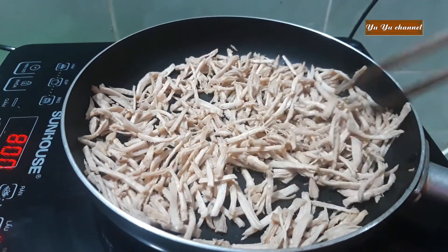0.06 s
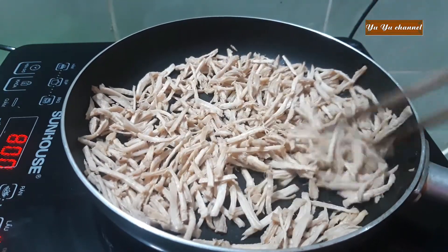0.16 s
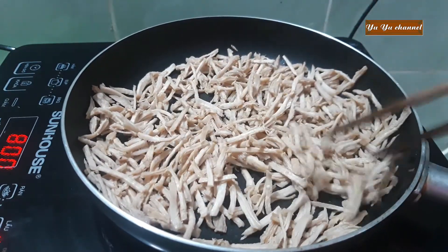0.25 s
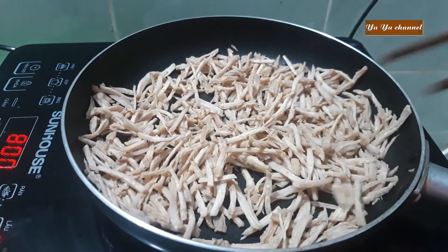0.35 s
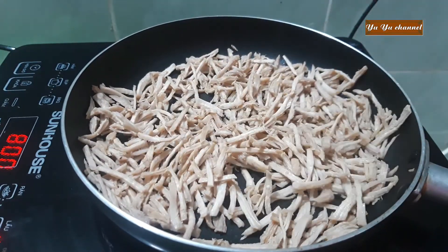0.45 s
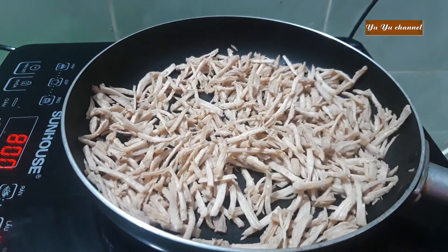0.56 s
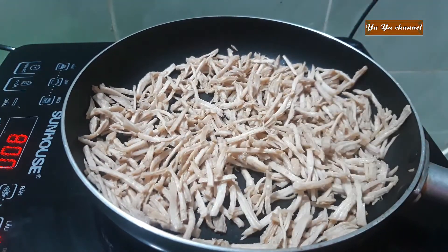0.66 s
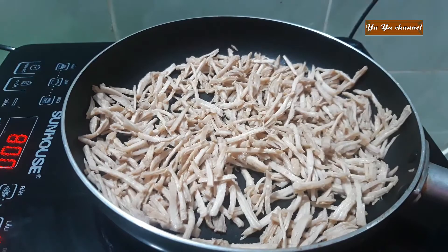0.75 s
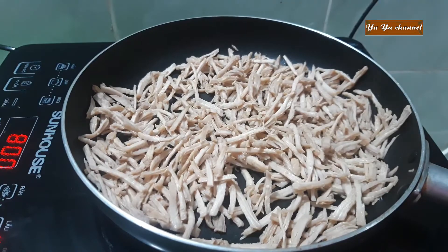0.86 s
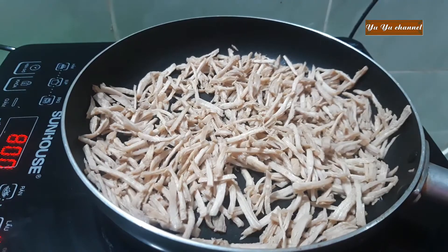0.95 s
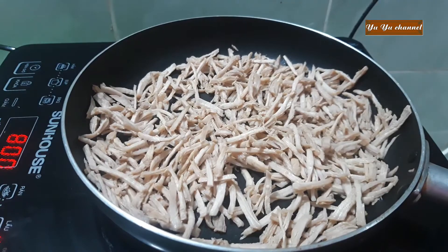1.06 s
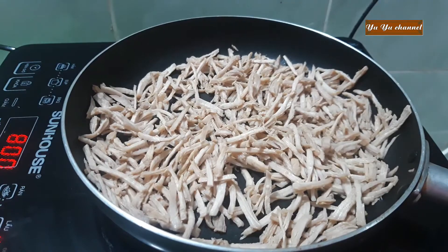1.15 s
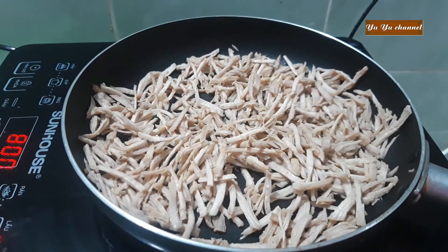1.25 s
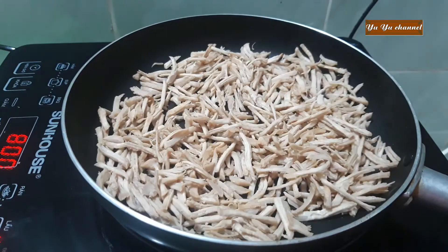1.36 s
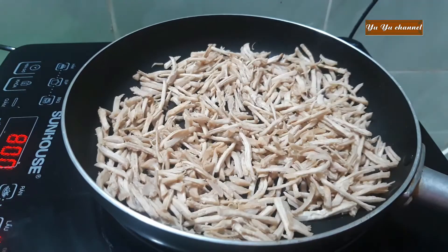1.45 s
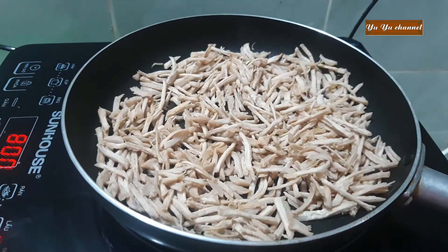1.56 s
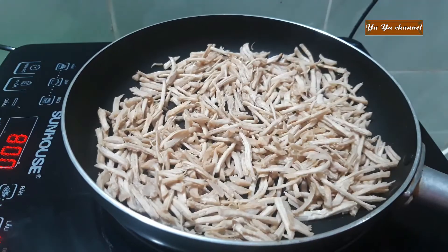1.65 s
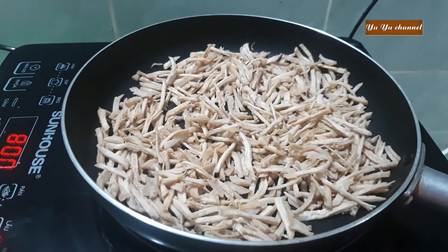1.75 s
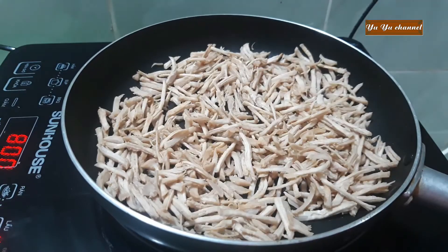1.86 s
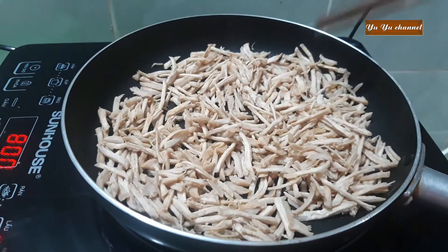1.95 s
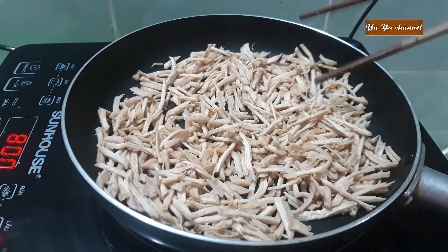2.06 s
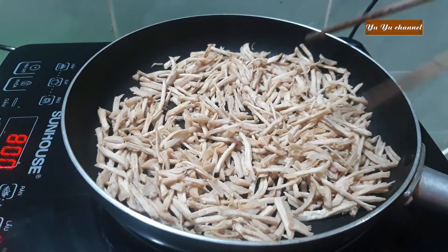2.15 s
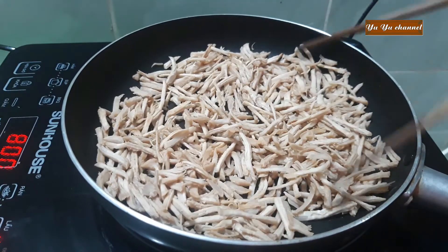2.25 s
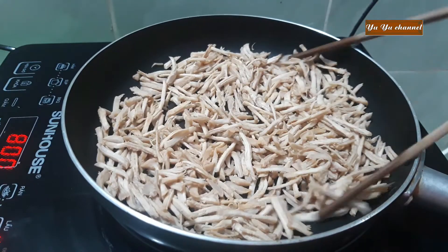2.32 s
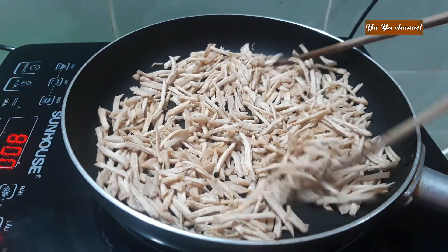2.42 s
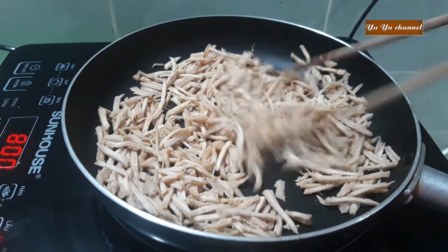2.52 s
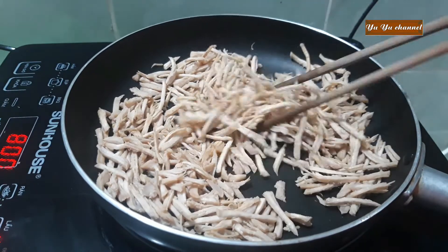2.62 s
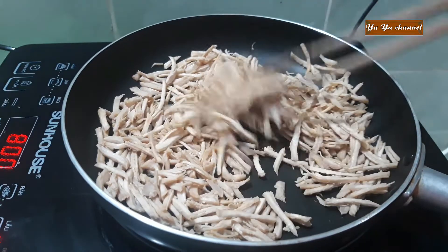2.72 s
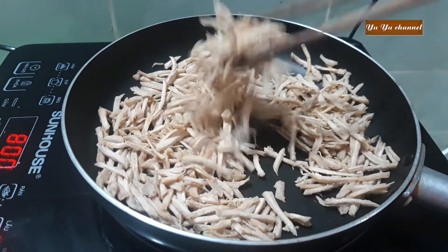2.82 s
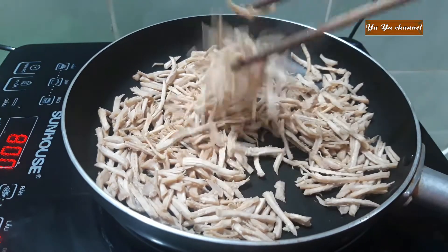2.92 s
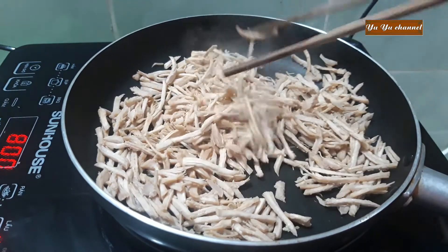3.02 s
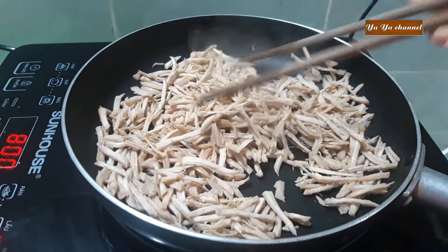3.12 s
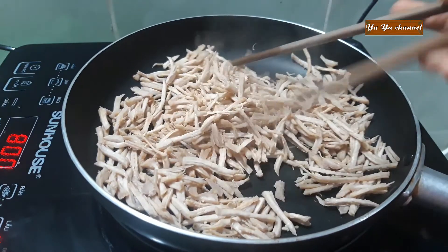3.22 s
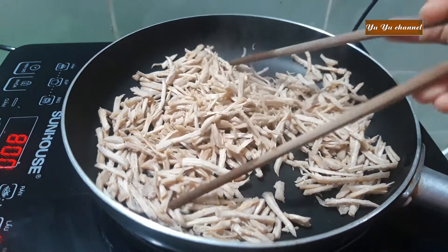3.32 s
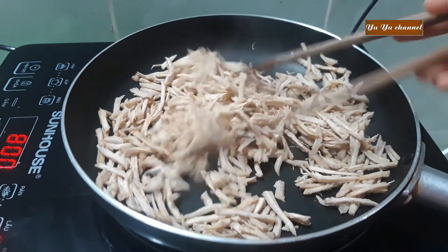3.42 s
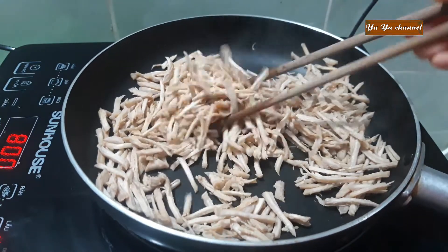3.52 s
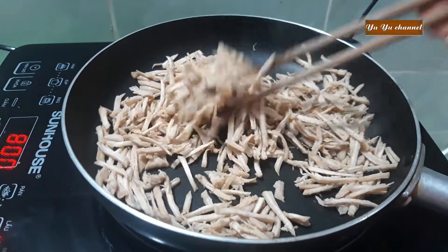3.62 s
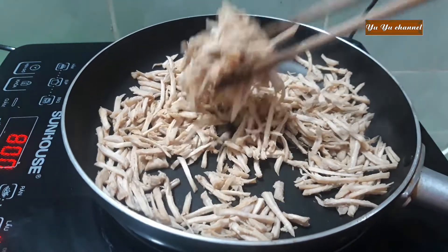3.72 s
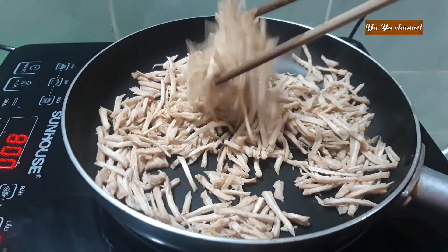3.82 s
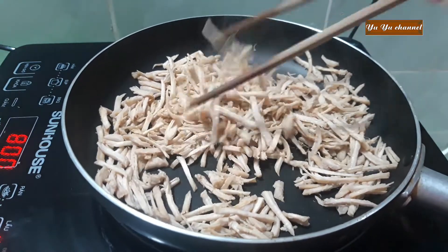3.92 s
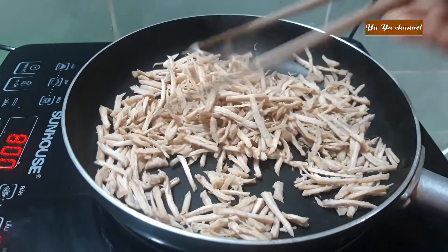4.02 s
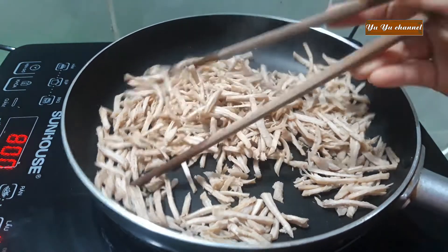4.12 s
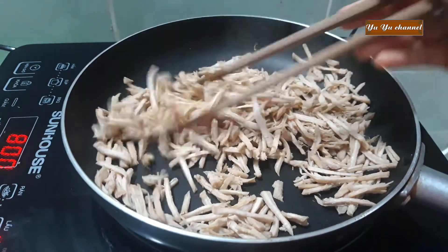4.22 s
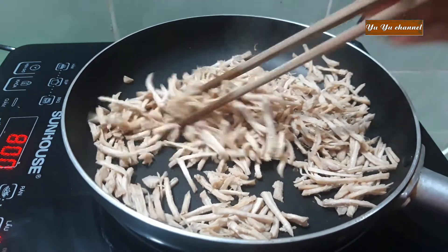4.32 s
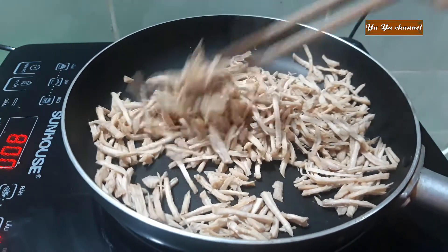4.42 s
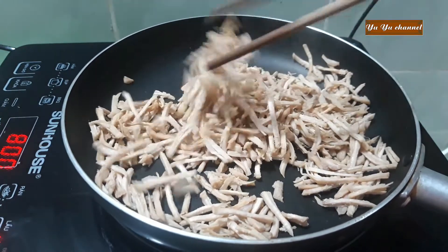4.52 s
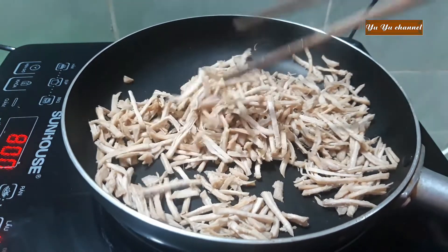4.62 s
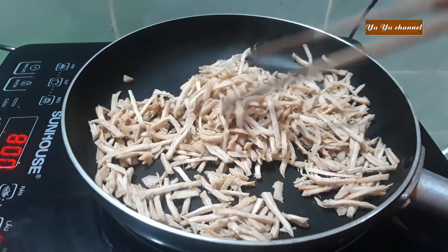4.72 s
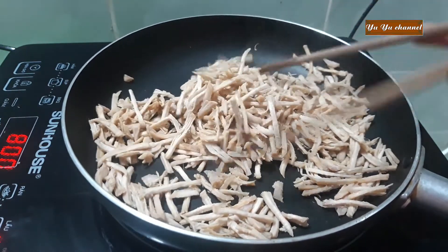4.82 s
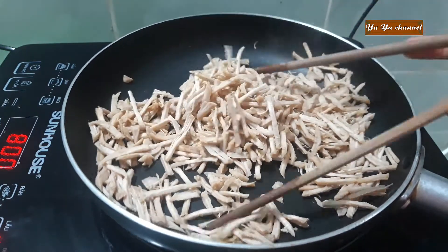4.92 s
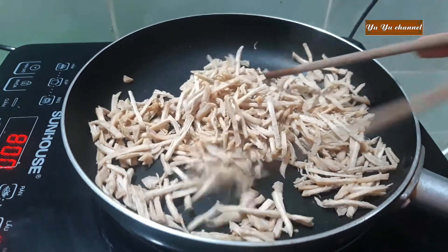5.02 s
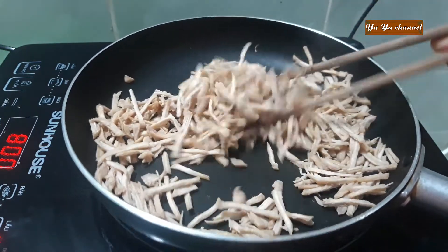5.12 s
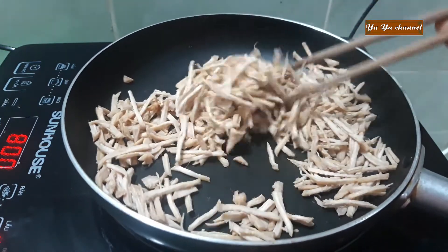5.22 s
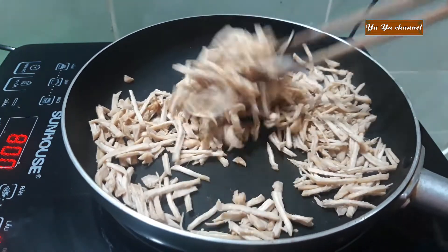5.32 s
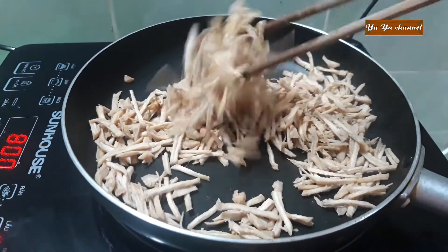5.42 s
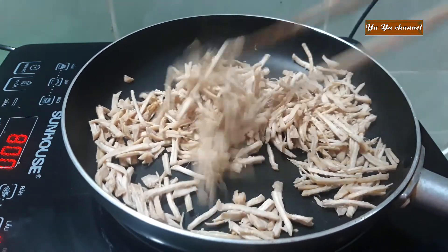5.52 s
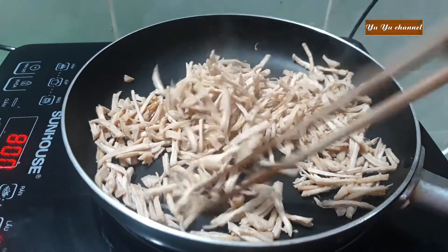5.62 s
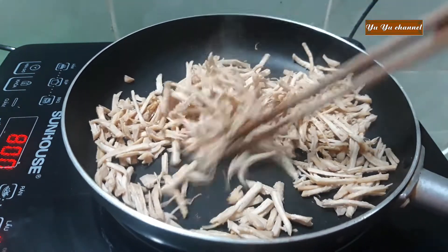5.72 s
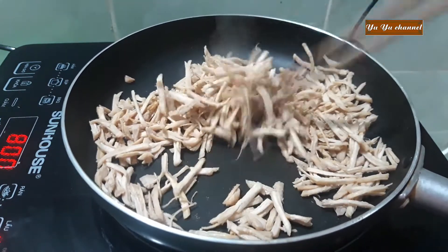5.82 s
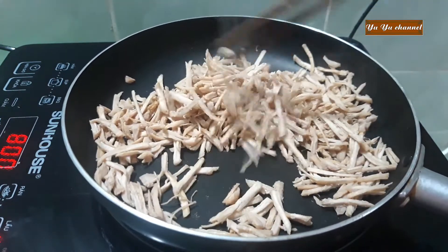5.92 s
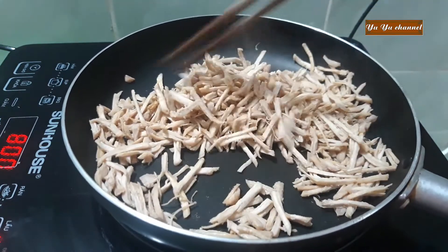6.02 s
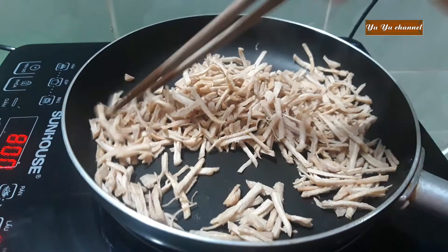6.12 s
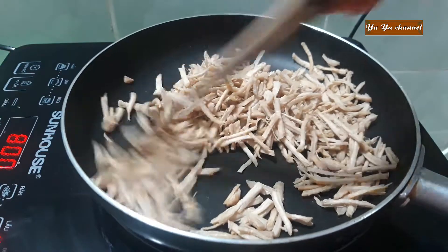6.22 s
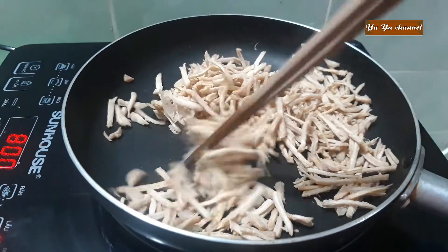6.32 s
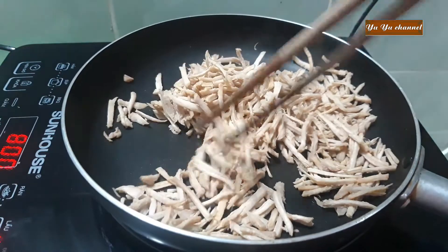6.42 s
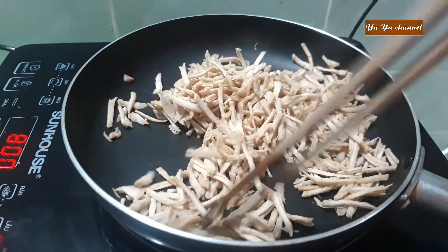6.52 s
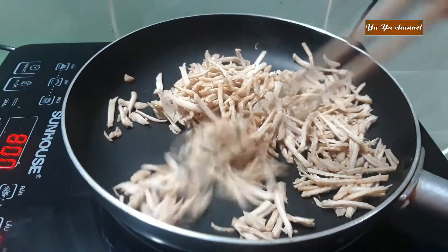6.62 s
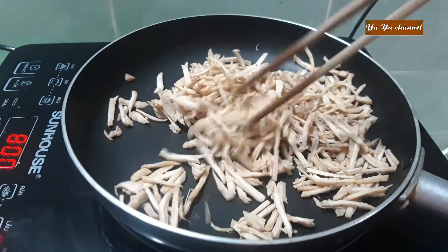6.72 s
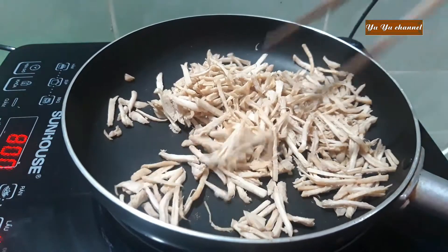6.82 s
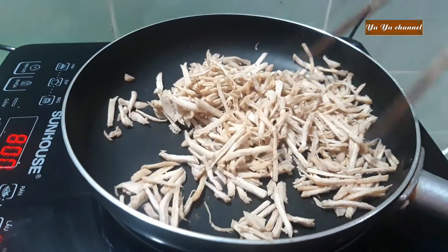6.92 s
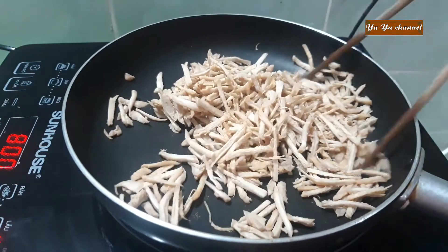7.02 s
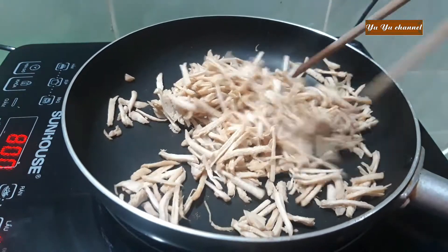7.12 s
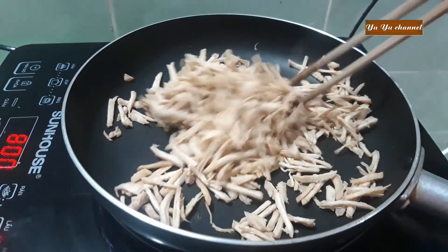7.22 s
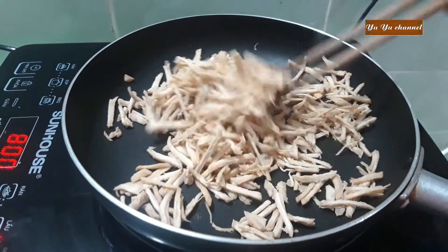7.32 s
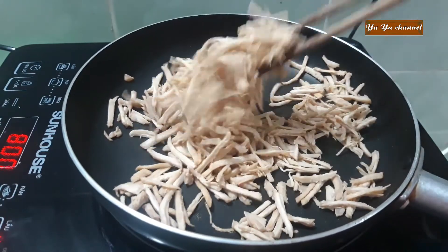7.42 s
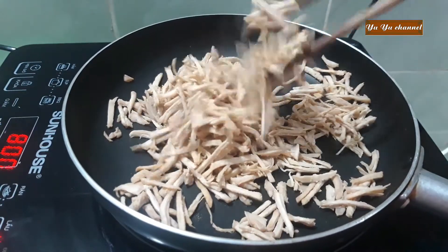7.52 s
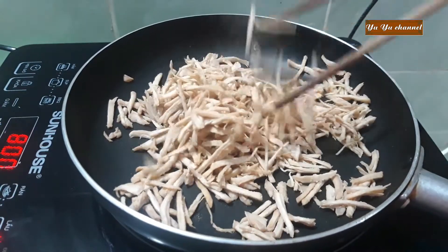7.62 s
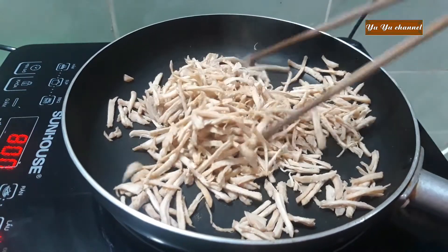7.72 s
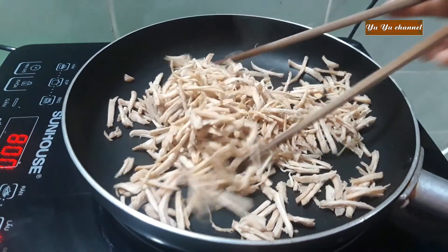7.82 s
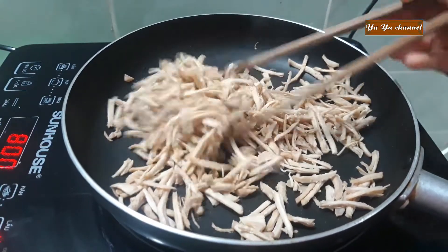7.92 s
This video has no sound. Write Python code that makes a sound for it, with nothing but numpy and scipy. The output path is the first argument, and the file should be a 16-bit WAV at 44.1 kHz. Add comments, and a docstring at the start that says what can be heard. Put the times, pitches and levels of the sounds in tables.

```python
"""One microphone, close to a thin pan on an electric hob in a small kitchen.
From the start the hob's cooling fan hums underneath and shredded meat fries: steam bubbles burst in the
fat as hiss, crackle and pops. Wooden chopsticks tap the pan once, then toss the meat from about two
seconds on, tapping and scraping the metal so that it rings. Around the middle a low handling rumble
swells. Just after four seconds the pan jolts on the glass top, and again, faintly, at seven."""
import sys
import numpy as np
from scipy import signal
from scipy.fft import rfft, irfft, next_fast_len
from scipy.io import wavfile
from scipy.ndimage import map_coordinates

SR = 44100
rng = np.random.default_rng(int(sys.argv[2]) if len(sys.argv) > 2 else 0)


def waveform_to_disk(signal):
    """Save audio, clipped to [-1, 1], as 16-bit WAV at the path in sys.argv[1]."""
    frames = np.transpose(np.atleast_2d(signal))
    scaled = np.clip(frames, -1, 1) * 32767
    samples = np.round(scaled).astype(np.int16)
    wavfile.write(sys.argv[1], SR, samples)


N = 351036

# The fan's rushing air. Each row: frequency in Hz, relative level in dB.
AIR_COLOUR = [(18, -46), (30, -11.5), (69, -0.5), (128, -5), (189, -5), (252, -10), (396, -1), (447, -3),
              (527, -2.5), (608, -5.5), (897, -2.5), (2040, -16), (4000, -28.5), (5200, -27), (8800, -120)]
# Blade and motor tones. Each row: frequency in Hz, level in dB.
FAN_TONES = [(176.5, -66.5), (199.6, -63), (224, -76.5), (404, -66), (528.5, -64.5), (882, -69),
             (1059, -70.5), (1235, -72.5)]
# A low handling rumble that swells around the middle. Each row: time in seconds, gain in dB.
HANDLING_RUMBLE = [(0, -12), (1.3, -11), (1.7, -2), (3.3, -2), (4.7, 3), (5.8, 0), (6.2, -1), (7.96, 0)]
# How hard the fat fries. Each row: time in seconds, level in dB.
FRYING_LEVEL = [(0, -43), (.2, -39), (.35, -42), (.9, -39), (1.26, -41), (1.43, -45), (2.25, -45),
                (2.62, -34), (2.72, -36.5), (2.77, -46), (2.9, -47), (2.95, -39), (3.38, -36), (3.6, -35),
                (3.72, -46), (3.89, -44), (4.17, -40), (4.28, -31.5), (4.53, -42.5), (4.8, -39.5),
                (5.06, -37), (5.23, -38), (5.33, -47.5), (5.45, -42), (5.69, -43), (5.91, -44), (6.1, -41),
                (6.35, -39), (6.51, -43), (6.97, -39), (7.2, -35), (7.5, -38), (7.96, -35)]
# Juice boils off hot metal. Each row: time of the crest in seconds, level in dB, seconds to fall 10 dB.
SPURTS = [(0.101, -39, 0.0466), (.22, -34, 0.05), (.54, -41.5, 0.0671), (.73, -40.5, 0.0236),
          (.9, -40, .04), (1.11, -41, 0.0159), (1.85, -45.5, 0.0068), (2.84, -43.5, 0.06),
          (3.05, -35, 0.0426), (3.13, -35, 0.0549), (3.431, -30, 0.1174), (3.941, -35.5, 0.0921),
          (4.86, -42.5, 0.05), (4.98, -36.5, 0.0616), (5.111, -35.5, 0.1123), (5.469, -36, 0.03),
          (5.6, -39, 0.03), (5.8, -30, 0.0992), (5.989, -37.5, 0.0946), (6.19, -36, 0.072),
          (6.32, -36, 0.11), (6.7, -33, 0.15), (7.21, -33.5, 0.0817), (7.37, -36, .04), (7.67, -37, 0.05),
          (7.841, -35.5, 0.0523)]
# Frying heard from close by. Each row: frequency in Hz, relative level in dB.
FRYING_COLOUR = [(710, -61.5), (1200, -18), (1440, -9), (2020, -14.5), (2680, -9.5), (3290, -2), (3700, -7),
                 (4310, -0.5), (4860, -3.5), (9410, 0), (10300, -4), (16000, -5)]
# The biggest bubbles. Each row: start in seconds, level in dB, pitch in Hz.
BIG_POPS = [(0.03, -6, 4500), (0.0904, -14.5, 5360), (0.1665, -16.5, 9075), (0.1749, -16, 5700),
            (0.1902, -8.5, 6820), (0.2079, -12, 9480), (0.2202, -12, 6400), (0.2512, -6, 7260),
            (0.2584, -15, 7100), (0.34, -17, 5692), (0.5087, -6, 4600), (0.5885, -15, 4178),
            (0.7139, -12.5, 7030), (0.801, -17, 6130), (0.8444, -9, 8800), (0.8728, 2.5, 4655),
            (1.0933, -15, 5200), (1.1058, -15, 6300), (1.1709, -14.5, 7150), (1.2472, -17.5, 5810),
            (1.33, -19.5, 6993), (1.5906, -8, 9230), (1.8198, -11, 5400), (2.1324, -17.5, 9870),
            (2.4543, -12, 7703), (2.5696, -8, 8810), (2.5751, -12.5, 5900), (2.5834, -9, 8420),
            (2.6347, -7, 13000), (2.719, -14.5, 5500), (2.8145, -10, 6463), (2.8464, -17, 5477),
            (2.9795, -13, 6710), (3.0146, -11.5, 13000), (3.0556, -12, 5920), (3.0626, -11, 5900),
            (3.1092, -13, 11400), (3.2477, -14.5, 5511), (3.2496, -9, 5719), (3.3073, -11.5, 6490),
            (3.3201, -9.5, 7040), (3.412, -11, 6700), (3.4401, -13, 12750), (3.4873, -2.5, 10900),
            (3.6441, -15.5, 7500), (3.7452, -18.5, 6193), (3.8311, -19, 5600), (3.8643, -17, 8060),
            (3.9113, -10, 10780), (3.9241, -14.5, 5570), (4.1438, -14.5, 7470), (4.2541, -13, 9440),
            (4.3231, -8.5, 7057), (4.4127, -15, 9080), (4.4374, -12.5, 4756), (4.6752, -16, 11050),
            (4.7739, -2.5, 7978), (4.8437, -11, 7035), (4.9174, -16, 8290), (4.9759, -15, 6800),
            (4.99, -11.5, 6270), (5.0205, -8.5, 8990), (5.0383, -11.5, 8300), (5.3819, -13, 7581),
            (5.477, -14, 6562), (5.7812, -13.5, 6649), (5.8339, -4, 6230), (6.1077, -14, 8450),
            (6.2439, -18, 7500), (6.3155, -9.5, 5238), (6.3212, -12.5, 6943), (6.3782, -12, 8100),
            (6.6463, -13, 8162), (6.7609, -13.5, 4368), (6.8196, -12.5, 6300), (6.9415, -7.5, 5903),
            (6.9736, -16, 6440), (6.9954, -13, 5472), (7.1602, -13.5, 7160), (7.1739, -10, 6898),
            (7.3398, -16.5, 7100), (7.3707, -16, 6700), (7.4585, -10, 8540), (7.4819, -8, 6900),
            (7.5516, -10, 5723), (7.5843, -13, 5500), (7.5963, -9, 7100), (7.6335, -8.5, 6668),
            (7.7512, -12, 6622), (7.7577, -11, 9700), (7.8322, -11, 13000), (7.8762, -13, 11490)]
# The colour of a pop. Each row: frequency in Hz, gain in dB.
POP_COLOUR = [(450, -35), (900, -8.5), (2200, -10), (3500, -1.5), (9300, 0), (11000, -2), (16000, -2.5)]
# Echoes off the pan wall and the tiles. Each row: delay in seconds, gain in dB.
NEAR_ECHOES = [(.0011, -8), (.0022, -13), (.0057, -20)]
# Chopstick on pan. Each row: start in seconds, level in dB, brightness in dB per octave,
# contact time in milliseconds, then the gains of pan wall, pan bottom and stick in dB.
TAPS = [(.110, -26, -1.5, 3.1, -7.5, -12, -2), (2.289, -21, -0.5, 0.653, -8, -11, -1),
        (2.373, -21.5, 1.5, 3.1, -19, -19.5, -2.5), (3.117, -16.5, 3, 12, -16, -19.5, -10),
        (4.053, -15.5, -0.57, 5.55, -16.5, -22.5, -26.5), (4.204, -13, -1.84, 10.2, -20.5, -17, -9),
        (7.016, -6, 0.5, 10, -13, -22, -16)]
# Modes of the pan wall, the pan bottom and a wooden stick.
# Each row: frequency in Hz, level in dB, seconds to fall 60 dB.
WALL_MODES = [(777.4, -17, 0.497), (2179, -16.5, 0.1196), (2456, -2.5, 0.1107), (3460, -12, .12),
              (3754, -6, 0.075), (4235, -6.5, 0.123), (4515, -7.5, 0.158), (5123, -5.5, .08),
              (6017, -9.5, 0.098), (7280, -10.5, 0.066), (7975, -13, 0.102), (9070, -10, 0.069)]
BOTTOM_MODES = [(1183.2, -5, 0.1154), (1347, -10, 0.079), (1835.4, -0.5, 0.1233), (3120, -5, .05)]
STICK_MODES = [(1428.7, -2.5, 0.0195), (3373, -1, 0.0337), (5370, -7, 0.0157), (6826, -9.5, 0.037)]
# Small contacts that ring briefly. Each row: start in seconds, level in dB, pitch in Hz.
PINGS = [(1.821, -25, 4900), (2.6, -31, 3400), (7.551, -25, 3300), (7.656, -30.5, 3380)]
# A stick dragged over the pan bottom. Each row: start in seconds, length in seconds, level in dB.
SCRAPES = [(5.07, .14, -43), (5.74, .09, -44), (5.66, .04, -50), (6.34, .05, -50), (2.34, .04, -48),
           (2.6, .05, -46)]
# The pan jolts on the hob. Each row: start in seconds, level in dB.
JOLTS = [(4.204, -24.5), (7.016, -43)]
# Modes of the glass top. Each row: frequency in Hz, level in dB, seconds to fall 60 dB.
GLASS_MODES = [(221, -11, .2), (404, 0, .1), (475, -7, .2), (526, -3, .14), (610, -6, .08), (692, -7, .05),
               (840, -9, .04)]
# The kitchen's reverberation. Each row: frequency in Hz, seconds to fall 60 dB.
KITCHEN_DECAY = [(300, 0.82), (3000, 0.204), (12000, 0.025)]


def amp(db):
    """Decibels to gain."""
    return 10 ** (np.asarray(db) / 20)


def unit(x):
    """Scaled to rms 1."""
    return x / np.sqrt(np.mean(x ** 2) + 1e-20)


def along(points, hz):
    """Reads between (Hz, value) points on a log frequency axis."""
    freqs, values = np.transpose(points)
    return np.interp(np.log(hz + 1), np.log(freqs + 1), values)


def wobble(rate):
    """A smooth random curve, rate knots a second."""
    return map_coordinates(rng.standard_normal(int(N * rate / SR) + 4), [np.arange(N) * rate / SR])


def coloured(x, spectrum):
    """x through a minimum-phase filter with the given (Hz, dB) shape."""
    size = 2 * next_fast_len(N // 2 + 4096)
    gain = amp(along(spectrum, np.fft.rfftfreq(size, 1 / SR)))
    cepstrum = irfft(np.log(gain + 1e-6), size)
    cepstrum[1:size // 2] *= 2
    cepstrum[size // 2 + 1:] = 0
    return irfft(rfft(x, size) * np.exp(rfft(cepstrum)), size)[:N]


def noise(spectrum):
    """Noise of rms 1 with the given (Hz, dB) shape."""
    return unit(coloured(rng.standard_normal(N), spectrum))


def ring(modes, t, rise_cycles, gain_db=0):
    """Sum of dying modes, each swelling quickly and beating as if with a weaker close twin."""
    out = np.zeros(len(t))
    for (hz, db, t60), extra_db in zip(modes, np.broadcast_to(gain_db, len(modes))):
        envelope = amp(db + extra_db - 60 * t / t60) * (1 - np.exp(-t * hz / rise_cycles))
        beating = 1 + .3 * np.cos(2 * np.pi * (.006 * hz * t + rng.random()))
        out += envelope * beating * np.sin(2 * np.pi * hz * t)
    return out


def bursts(starts, db, hz, cycles, spray_db, spray_t60, samples):
    """Each burst is a tone dying to 1/e in the given cycles, with a short spray of noise."""
    offsets = np.arange(samples)
    t = offsets / SR
    tone = np.sin(2 * np.pi * hz[:, None] * t) * np.exp(-hz[:, None] * t / cycles)
    spray = amp(spray_db - 60 * t / spray_t60) * rng.standard_normal((len(starts), samples))
    at = (starts * SR).astype(int)[:, None] + offsets
    return np.bincount(at.ravel(), (amp(db)[:, None] * (tone + spray)).ravel(), N + samples)[:N]


def fan(air_db=-53):
    """The cooling fan under the pan: rushing air and slightly unsteady blade and motor tones."""
    t = np.arange(N) / SR
    air = amp(air_db + .175 * wobble(6.5)) * noise(AIR_COLOUR)
    tones = sum(amp(db + 1.63 * wobble(7.7)) * np.sin(2 * np.pi * hz * t + .204 * wobble(3.7))
                for hz, db in FAN_TONES)
    return air, np.sqrt(2) * tones


def with_handling_rumble(bed, below_hz=170):
    """A low handling rumble, made by sinking and swelling the bass of a bed of noise."""
    deep = signal.lfilter(*signal.butter(2, below_hz, fs=SR), bed)
    gain = amp(np.interp(np.arange(N) / SR, *np.transpose(HANDLING_RUMBLE)))
    return bed + (gain - 1) * deep


def frying_db(rise_over_fall=.8):
    """How hard the fat fries at each sample: its slow heat plus quick spurts of boiling juice."""
    t = np.arange(0, N / SR, .002)
    power = amp(2 * np.interp(t, *np.transpose(FRYING_LEVEL)))
    for crest, db, fall_s in SPURTS:
        drop_db = 10 * np.maximum((crest - t) / rise_over_fall, t - crest) / fall_s
        power += amp(2 * (db - drop_db))
    return np.interp(np.arange(N) / SR, t, 10 * np.log10(power))


def sizzle(level_db, hiss_follows=.892, simmer_db=-52.5):
    """Hiss of countless tiny bubbles, and a crackle that thickens as the fat fries harder."""
    surge_db = level_db - np.median(level_db)
    hiss = noise(FRYING_COLOUR) * amp(.96 * wobble(30) + 2.14 * wobble(110))
    hiss *= amp(-5 + (hiss_follows - 1) * surge_db)  # the hiss swings less than the crackle
    when, luck, pitch, size = rng.random((4, 6000))
    heard = luck < .42 * amp(1.2 * surge_db[(when * N).astype(int)])
    sizes_db = np.minimum(-5 * np.log(size), 13)  # many small bubbles, few large
    bubbles = bursts(when[heard] * N / SR, sizes_db[heard], 5200 * 2.6 ** pitch[heard],
                     cycles=.7, spray_db=-8, spray_t60=.005, samples=300)
    crackle = amp(-3.5) * unit(coloured(bubbles, FRYING_COLOUR))
    simmer = amp(simmer_db) * noise(FRYING_COLOUR)  # even hiss from under the undisturbed meat
    return simmer + amp(level_db) * (hiss + crackle)


def middling_pops(level_db, mean_db=-18.5, spread_db=2.5):
    """Random bubbles in rows like BIG_POPS, more of them where the fat fries harder."""
    surge_db = level_db - np.median(level_db)
    when, luck, size, pitch = rng.random((200, 4)).T
    heard = luck < .33 * amp(1.5 * surge_db[(when * N).astype(int)])
    return np.transpose([when * N / SR, mean_db + spread_db * (2 * size - 1), 5000 * 2 ** pitch])[heard]


def pops(level_db):
    """Single steam bubbles burst: pan wall and tiles answer, and thrown droplets fizz on for a moment."""
    starts, db, hz = np.vstack([BIG_POPS, middling_pops(level_db)]).T
    bubbles = bursts(starts, db, hz, cycles=.4975, spray_db=-15.5, spray_t60=.00586, samples=600)
    snaps = amp(5.5) * coloured(bubbles, POP_COLOUR)
    t = np.arange(SR // 10) / SR
    fizz_shape = (1 - np.exp(-t / .004)) * amp(-60 * t / .07)
    fizz_envelope = signal.fftconvolve(abs(snaps), fizz_shape)[:N]
    droplets = amp(-47) * fizz_envelope * noise(POP_COLOUR) * amp(7.9 * wobble(500))
    echoes = sum(amp(gain_db) * np.pad(snaps, (round(lag * SR), 0))[:N] for lag, gain_db in NEAR_ECHOES)
    return snaps + droplets + echoes


def taps():
    """A stick rattles on the pan for a few milliseconds and sets wall, bottom and itself ringing."""
    out, t = np.zeros(N + SR), np.arange(SR // 2) / SR
    for start, db, brightness, contact_ms, *gains_db in TAPS:
        contact = (1 - np.exp(-t / .000114)) * amp(-20 * t / (contact_ms / 1000))
        band_hz = np.clip(3500 * amp(3.27 * brightness), 800, 9000) * np.array([.4, 1.6])
        chatter = contact * rng.standard_normal(len(t))
        rattle = signal.lfilter(*signal.butter(2, band_hz, "band", fs=SR), chatter)
        tap = rattle / abs(rattle).max()
        for modes, gain_db in zip((WALL_MODES, BOTTOM_MODES, STICK_MODES), gains_db):
            tilt_db = brightness * np.log2(np.array(modes)[:, 0] / 2500)
            spot_db = rng.normal(0, 1.6, len(modes))  # each spot struck favours different modes
            tap += ring(modes, t, rise_cycles=1.57, gain_db=gain_db + tilt_db + spot_db)
        out[round(start * SR):][:len(t)] += amp(db) * tap
    return out[:N]


def pings():
    """A few small contacts ring briefly on one pitch."""
    return bursts(*np.transpose(PINGS), cycles=24.3, spray_db=-11.5, spray_t60=.0103, samples=2000)


def scrapes():
    """Uneven friction drives the stick and, more weakly, the wall of the pan."""
    t = np.arange(N) / SR
    strokes = sum(amp(db) * np.sin(np.pi * np.clip((t - start) / length, 0, 1))
                  for start, length, db in SCRAPES)
    friction = rng.standard_normal(N) * amp(4.74 * wobble(150))
    ring_t = t[:SR // 10]
    stick = ring(STICK_MODES, ring_t, rise_cycles=.69)
    wall = ring(WALL_MODES, ring_t, rise_cycles=.64, gain_db=-8) * amp(-60 * ring_t / .126)
    return strokes * unit(signal.fftconvolve(friction, stick + wall)[:N])


def jolts():
    """The pan knocks the glass top, which rings while the pan settles unevenly on it."""
    out, t = np.zeros(N + SR), np.arange(SR // 2) / SR
    for start, db in JOLTS:
        rocking = amp(6.45 * wobble(93.06)[:len(t)] * np.minimum(t / .0293, 1))
        out[round(start * SR):][:len(t)] += amp(db) * rocking * ring(GLASS_MODES, t, rise_cycles=.473)
    return out[:N]


def kitchen(x, delay_samples=240):
    """The small room answers a moment later, its treble dying sooner than its bass."""
    hz, t, spectra = signal.stft(rng.standard_normal(SR // 2), SR, nperseg=256)
    decay = amp(-60 * t / along(KITCHEN_DECAY, hz)[:, None])
    tail = signal.istft(spectra * decay, SR, nperseg=256)[1]
    return signal.fftconvolve(np.pad(x, (delay_samples, 0)), tail / np.linalg.norm(tail))[:N]


def scene():
    """Close to the pan: mostly direct sound, with a little room on the pops and contacts."""
    level_db = frying_db()
    hits = pops(level_db) + pings() + taps() + jolts() + scrapes()
    cooking = hits + amp(-16.5) * kitchen(hits) + sizzle(level_db)
    air, hum = fan()
    return (cooking + with_handling_rumble(air) + hum)[None]


def record(dry, low_cut_hz=45, port_hz=9300, port_width_hz=1300, top_hz=15800):
    """One small microphone: no deep bass, a port resonance in the treble, nothing above top_hz."""
    hz = np.fft.rfftfreq(N, 1 / SR)
    damping = 1j * hz * port_width_hz
    port = 1 + amp(-6) * damping / (port_hz ** 2 - hz ** 2 + damping)
    low_cut = (1j * hz / (low_cut_hz + 1j * hz)) ** 2
    return irfft(rfft(dry, axis=1) * port * low_cut * (hz < top_hz), N, axis=1)


dry = scene()
out = record(dry)
waveform_to_disk(out)
```